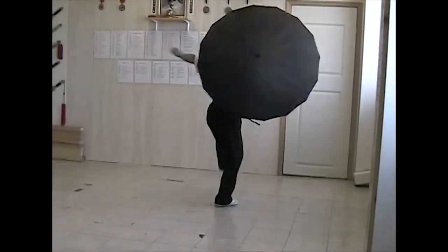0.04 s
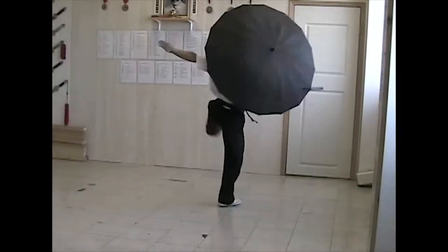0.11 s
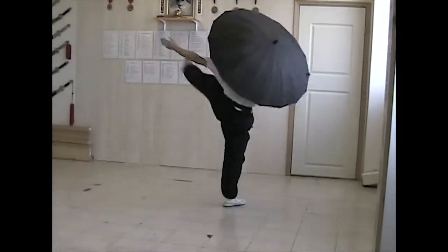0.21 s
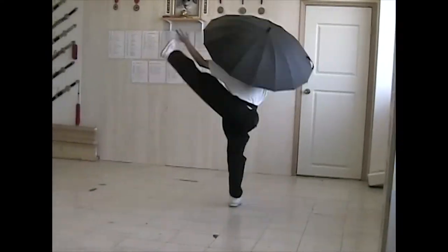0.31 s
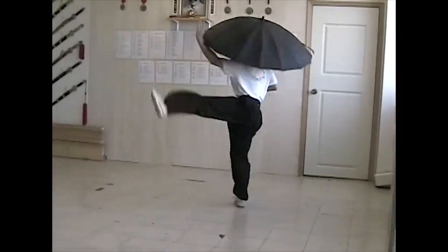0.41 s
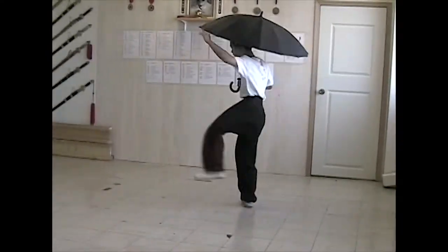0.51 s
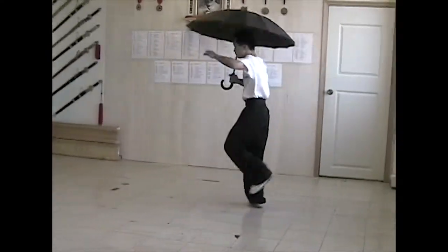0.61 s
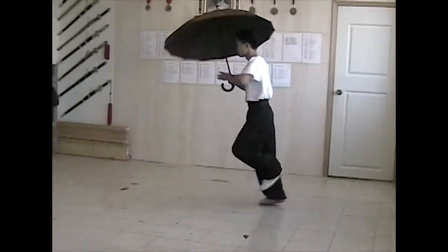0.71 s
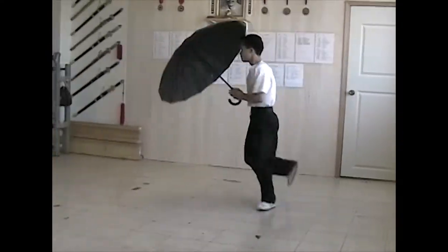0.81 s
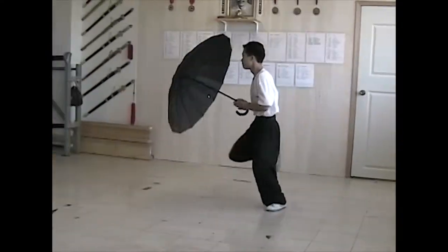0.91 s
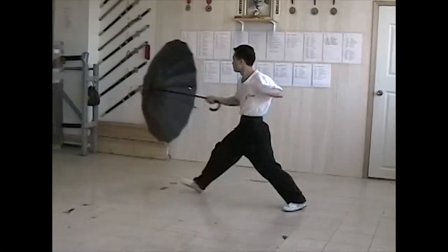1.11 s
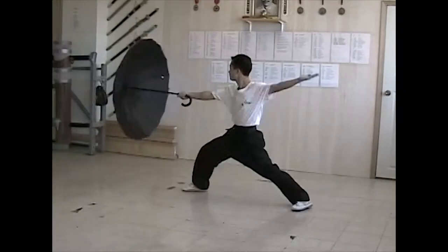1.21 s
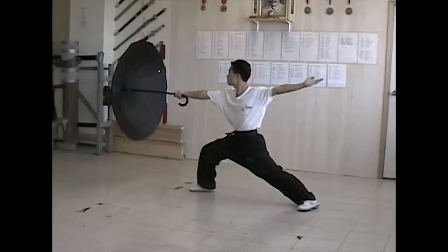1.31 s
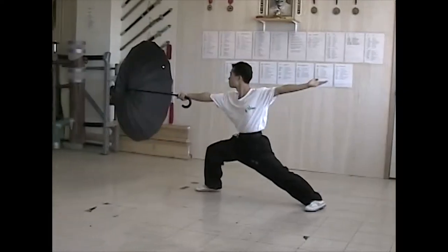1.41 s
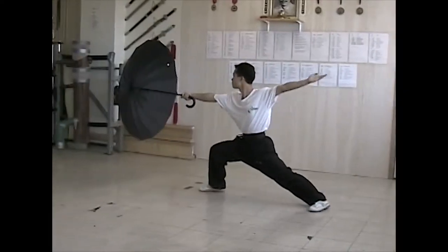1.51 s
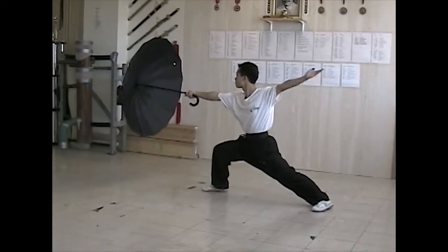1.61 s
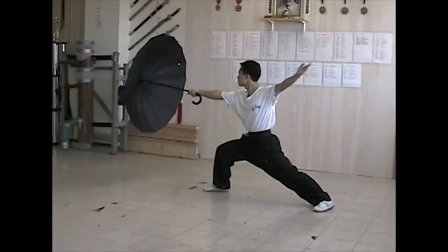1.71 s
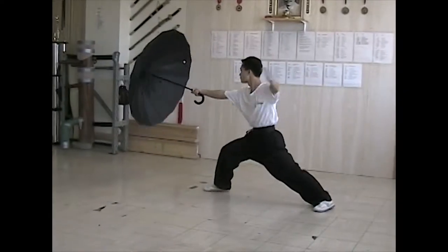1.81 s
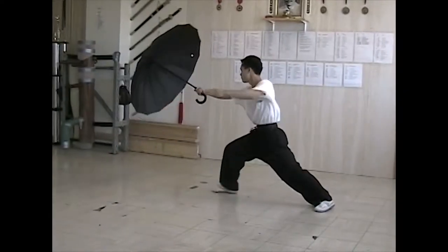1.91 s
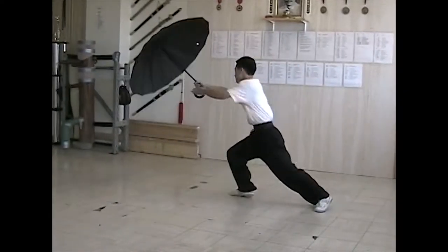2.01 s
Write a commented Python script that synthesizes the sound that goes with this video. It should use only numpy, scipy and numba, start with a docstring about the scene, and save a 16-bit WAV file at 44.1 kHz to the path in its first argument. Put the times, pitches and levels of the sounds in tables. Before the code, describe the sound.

Sharp slap of hand on foot, cloth swish, a hard shoe stamp and light sole scuffs indoors

```python
"""A hand slaps a kicking foot once in a tiled room: noise bursts and clicks form the slap and its early echo.
A shoe stamps down and soles tap and scuff into a lunge, built like the slap but with their own tone.
Clothes and umbrella cloth rustle as noise and grains over filtered room hum and a thin whine; hard walls ring.
A tape camcorder hears it through close ports, gain control, soft clip and notches against its drum noise."""
import sys
import numpy as np
from scipy import signal
from scipy.fft import rfft, irfft
from scipy.io import wavfile
from numba import njit

SR = 44100
rng = np.random.default_rng(int(sys.argv[2]) if len(sys.argv) > 2 else 0)


def store_wav(level_fs):
    """Save 16-bit WAV to argv[1]."""
    pcm = np.round(np.clip(np.atleast_2d(level_fs), -1, 1) * 32767)
    wavfile.write(sys.argv[1], SR, pcm.T.astype(np.int16))


N = 90405  # samples


def undb(db):
    """dB to gain."""
    return 10 ** (np.asarray(db) / 20)


def read(table, hz):
    """Read a (frequency, value) table along a log frequency axis."""
    points = np.array(table, float)
    return np.interp(np.log(np.maximum(hz, 1)), np.log(points[:, 0]), points[:, 1])


def colour(x, table):
    """Minimum-phase filter with the table's spectrum shape and unit power gain on white noise."""
    size = 4096
    cepstrum = irfft(np.log(undb(read(table, np.fft.rfftfreq(size, 1 / SR)))))
    # Folding the cepstrum forward in time makes the filter causal.
    cepstrum[1:size // 2] *= 2
    cepstrum[size // 2 + 1:] = 0
    impulse = irfft(np.exp(rfft(cepstrum)))[:size // 2]
    impulse = impulse / np.sqrt(np.sum(impulse ** 2))
    return signal.fftconvolve(x, impulse)[:len(x)]


# Stereo width of noise at the close ports: (frequency [Hz], side minus mid level [dB])
PORT_WIDTH = [(60, -10), (200, -25), (700, -21.5), (2400, -19), (4400, -18), (6500, -10.5), (7700, -4),
              (9300, -2), (12000, -7)]


def pair(count, wider_db=0):
    """Left and right noise from unrelated mid and side, so the width varies with frequency."""
    mid, side = rng.standard_normal((2, count))
    side_gain = undb(read(PORT_WIDTH, np.fft.rfftfreq(count, 1 / SR)) + wider_db)
    side = irfft(rfft(side) * side_gain, count)
    return np.array([mid + side, mid - side])


# Spectrum of the room noise, shape only: (frequency [Hz], level [dB])
HUM_TONE = [(18, -47), (40, -13.5), (120, -5.5), (220, -5.5), (360, -3), (700, -6.5), (1000, -8.5),
            (1700, -14), (3000, -25.5), (5700, -27), (9000, -34.5), (16000, -54)]
HUM_DB, HUM_WIDER_DB = -47.5, 5
WHINE_HZ, WHINE_DB, WHINE_WIDTH_HZ = 5880, -67, 10


def hum():
    """Steady coloured room noise, plus noise through a narrow resonance as a thin wavering whine."""
    air = np.array([colour(c, HUM_TONE) for c in pair(N, HUM_WIDER_DB)]) * undb(HUM_DB)
    resonance = signal.iirpeak(WHINE_HZ, WHINE_HZ / WHINE_WIDTH_HZ, SR)
    whine = signal.lfilter(*resonance, rng.standard_normal(N))
    return air + whine / np.std(whine) * undb(WHINE_DB)


# Spectrum of the cloth, shape only: (frequency [Hz], level [dB])
CLOTH_TONE = [(300, -44), (1000, 11), (3000, 2), (6000, 3.5), (10000, -3.5), (16000, -9.5)]
# Cloth movements: (middle time [s], half length to 1/e gain [s], level [dB])
SWISHES = [(0.088, 0.36, -58.5), (0.438, 0.055, -44.5), (.6, 0.092, -53.5), (0.734, 0.038, -53),
           (0.976, .015, -49), (1.047, 0.2, -54), (1.29, 0.056, -49), (1.65, 0.12, -61.5),
           (1.903, 0.06, -57), (2.036, 0.11, -55)]
GRAINS_PER_S = 2000


def rustle():
    """Noise and dense random cloth grains swell and fade with each movement."""
    grains = (rng.random(N) < GRAINS_PER_S / SR) * rng.standard_normal(N)
    wash = pair(N) + 0.66 * grains / np.std(grains)
    t = np.arange(N) / SR
    gain = sum(undb(db) * np.exp(-((t - middle) / half) ** 2) for middle, half, db in SWISHES)
    return np.array([colour(c, CLOTH_TONE) for c in wash]) * gain


# Reverberation of the hard walls: (frequency [Hz], time to fall 60 dB [s])
ROOM_T60 = [(100, 0.51), (260, 0.92), (700, 0.5), (1840, 0.49), (4850, 0.54), (12800, 0.18)]
ROOM_BUILD_S = 0.0012
ECHO_SPREAD_DB, ECHO_BLUR_S = 4, 0.029


def room(build_s):
    """One stereo room response: scattered echoes blur into noise and die band by band."""
    count = 2 ** 15
    t, hz = np.arange(count) / SR, np.fft.rfftfreq(count, 1 / SR)
    spread_db = ECHO_SPREAD_DB * np.exp(-t / ECHO_BLUR_S)
    echoes = undb(spread_db * rng.standard_normal(count))
    spectrum, ringing = rfft(pair(count) * echoes), 0
    for centre in 40 * 2 ** np.arange(0, 9.5, .5):
        # Triangular bands half an octave apart add up to a flat response.
        band = np.clip(1 - 2 * np.abs(np.log2(np.maximum(hz, 1) / centre)), 0, 1)
        decay = 1000. ** (-t / read(ROOM_T60, centre))
        ringing = ringing + irfft(spectrum * band, count) * decay
    return ringing * (1 - np.exp(-t / build_s)) / np.sqrt(SR / 100)


def blows(rows, tone):
    """Each row is a short rough burst, with a click before it if given; the room fills while it lasts."""
    out, t = np.zeros((2, N)), np.arange(2048) / SR
    for start, db, click, rise, length, top_hz, room_db in rows:
        push = pair(len(t)) * np.exp(-t / length) * (1 - np.exp(-t / rise)) ** 2
        # Click and burst share a fixed energy.
        click = np.clip(click, 0, 1)
        push *= np.sqrt((1 - click) / np.sum(push ** 2) * 2)
        push[:, 0] = np.sqrt(click)
        heard = undb(room_db) * room(ROOM_BUILD_S + rise + length)
        heard[:, :len(t)] += signal.lfilter(*signal.butter(1, top_hz, fs=SR), push)
        i = int(start * SR)
        # Every row gets 20 dB on top of its relative level.
        out[:, i:i + heard.shape[1]] += 10 * undb(db) * heard[:, :N - i]
    return np.array([colour(c, tone) for c in out])


# All burst tables below: (time [s], relative level [dB], click share of energy [0-1], rise [s],
# burst decay [s], direct sound low-pass [Hz], room level [dB])
# All their tone tables, shape only: (frequency [Hz], level [dB])
# Soles scuffing the floor
SCUFFS = [(1.1856, -25, 0, .001, .012, 14000, -2), (1.2345, -23.5, 0.014, 0.0016, 0.0069, 14000, -6)]
SCUFF_TONE = [(35, -24), (130, 1), (250, -17), (500, 2.5), (1400, 1.5), (2500, -5.5), (4200, -3.5),
              (9000, -4.5), (16000, -21.5)]


def scuffs():
    """Soles rub the floor in bursts with little or no click."""
    return blows(SCUFFS, SCUFF_TONE)


# Soles tapping the floor
TAPS = [(1.1153, -29, 0.27, .0003, .002, 9000, -5.5), (1.4, -45, 0.25, .0005, 0.0022, 5000, -11),
        (2.003, -41, 0.11, .0005, 0.0054, 9000, -4)]
TAP_TONE = [(35, -47), (200, -9), (700, 1.5), (1500, -5), (3500, -6.5), (6000, -6.5), (9000, -20),
            (16000, -26)]


def taps():
    """Soles touch down lightly: a click and a burst lasting a few milliseconds."""
    return blows(TAPS, TAP_TONE)


# The shoe stamping down
STAMPS = [(.7659, -9, 0.28, 0.00033, 0.0014, 12200, 0.5), (.807, -22, 0.13, 0.0007, 0.0024, 12000, -10)]
STAMP_TONE = [(35, -48), (100, -10.5), (200, -11.5), (350, -9.5), (600, 2), (850, -6.5), (1100, -1),
              (1500, -9), (2500, -13), (3500, -9), (5200, -6.5), (9000, -10), (12000, -14.5), (16000, -44)]


def stamps():
    """A shoe strikes the floor: short bright bursts that excite the room."""
    return blows(STAMPS, STAMP_TONE)


# Hand slapping the foot once: the slap's burst in overlapping pieces, with its strong early wall echo
SLAP_PIECES = [(.2158, 0.5, 0, 0.0026, .003, 2520, -5), (.2236, -4.5, 0.06, 0.00071, 0.0019, 1500, -12),
               (.2268, -0.5, 0.27, 0.00041, 0.00085, 5000, -9.5),
               (.2305, -7, 0.17, .0005, 0.0049, 2520, -15)]
SLAP_TONE = [(35, -60), (130, -40), (230, -16.5), (350, -8.5), (500, -4.5), (720, -1.5), (850, -3.5),
             (1050, -3.5), (1500, -8), (2300, -11), (2800, -14), (4800, -13.5), (9000, -25.5), (16000, -37)]


def slap():
    """A hand slaps a kicking foot once; the burst runs on and a wall echo follows milliseconds later."""
    return blows(SLAP_PIECES, SLAP_TONE)


def scene():
    """All sources at the microphone."""
    return hum() + rustle() + scuffs() + taps() + stamps() + slap()


# Frequency response of the capsules: (frequency [Hz], gain [dB])
MIC_RESPONSE = [(5500, 1.5), (6600, -3), (7600, -11.5), (9300, -4.5), (11000, -8.5), (16000, -17)]
PORT_TURN_HZ = 144


def ports(x):
    """The capsules dull the treble; in the bass the right one leads the left in phase."""
    # Phase per side, up to an eighth of a turn at the lowest frequencies.
    lag = np.arctan2(PORT_TURN_HZ, np.fft.rfftfreq(N, 1 / SR)) / 2
    # Undo the unit power scaling of colour(), so the table's gains hold.
    rms_gain = np.sqrt(np.mean(undb(read(MIC_RESPONSE, np.fft.rfftfreq(4096, 1 / SR))) ** 2))
    x = np.array([colour(c, MIC_RESPONSE) for c in x]) * rms_gain
    return irfft(rfft(x) * np.exp(1j * np.array([-lag, lag])), N)


@njit
def follow(x, rise, fall):
    """Level follower with separate rise and fall, as smoothing shares per sample."""
    levels, level = np.empty(len(x)), 0.
    for i in range(len(x)):
        level += (x[i] - level) * (rise if x[i] > level else fall)
        levels[i] = level
    return levels


AGC_TOP_DB, AGC_RATIO, AGC_ATTACK_S, AGC_RELEASE_S = -15.5, 1.83, 0.0047, 0.13
CLIP = 0.81  # soft ceiling, full scale = 1
DRUM_HZ, NOTCH_FEED = 300, 0.6  # more feedback narrows the notches
TOP_HZ = 15900


def record(dry):
    """Gain control, soft clip, notches at every multiple of the drum rate, steep top cut."""
    dry = ports(dry)
    level = follow(np.abs(dry).mean(axis=0), 1 / (AGC_ATTACK_S * SR), 1 / (AGC_RELEASE_S * SR))
    over = np.minimum(1, undb(AGC_TOP_DB) / (level + 1e-9))
    x = dry * over ** (1 - 1 / max(AGC_RATIO, 1))
    x = CLIP * np.tanh(x / CLIP)
    # Subtracting the sound one drum period ago cuts the notches.
    b, a = np.zeros((2, round(SR / DRUM_HZ) + 1))
    b[0], b[-1] = 1, -1
    a[0], a[-1] = 1, -min(NOTCH_FEED, .95)
    x = signal.lfilter(b, a, x) * (1 - a[-1]) / 2  # unit gain midway between notches
    return signal.sosfilt(signal.ellip(10, .2, 80, TOP_HZ, fs=SR, output="sos"), x)


dry = scene()
out = record(dry)
store_wav(out)
```